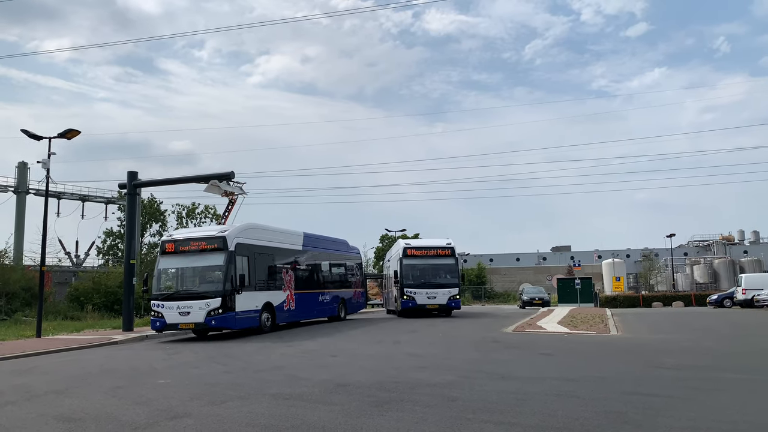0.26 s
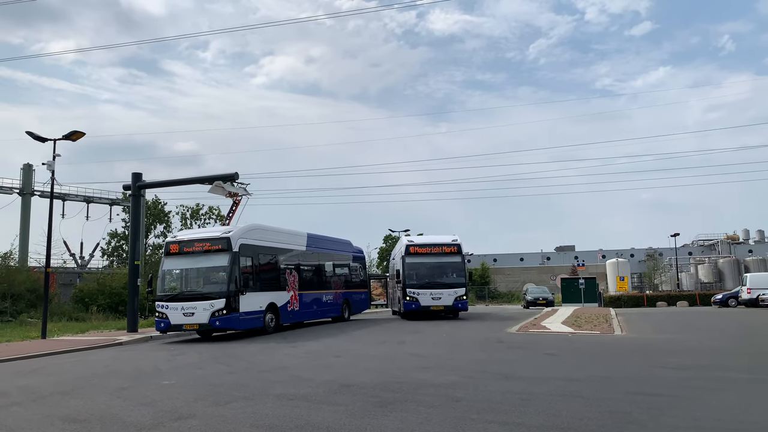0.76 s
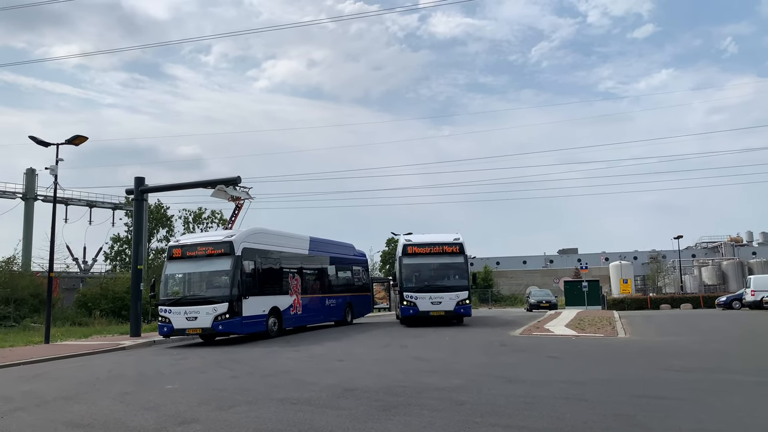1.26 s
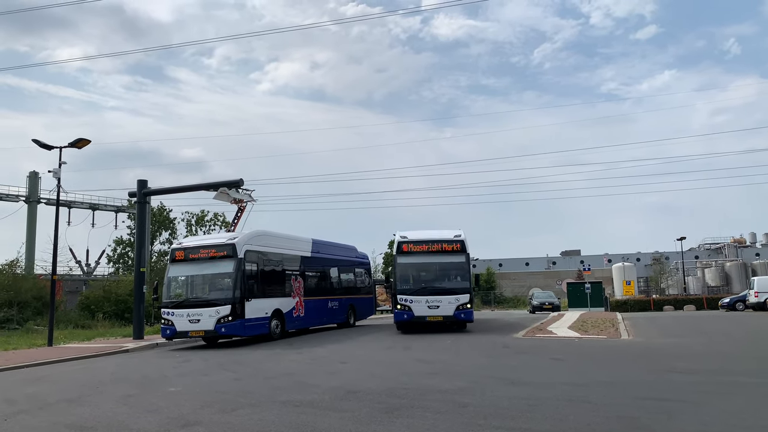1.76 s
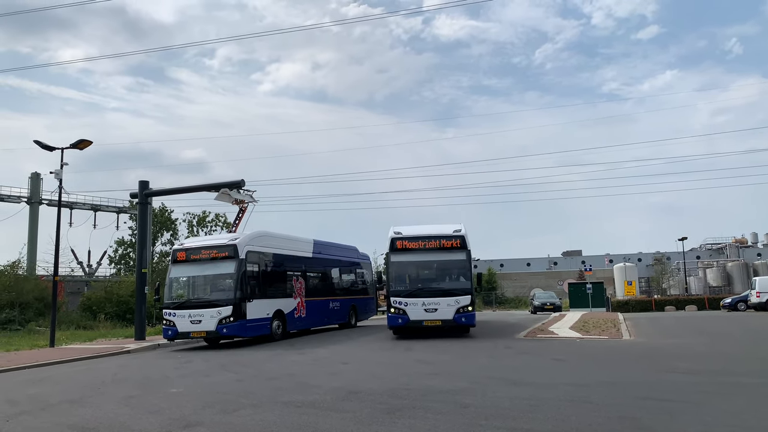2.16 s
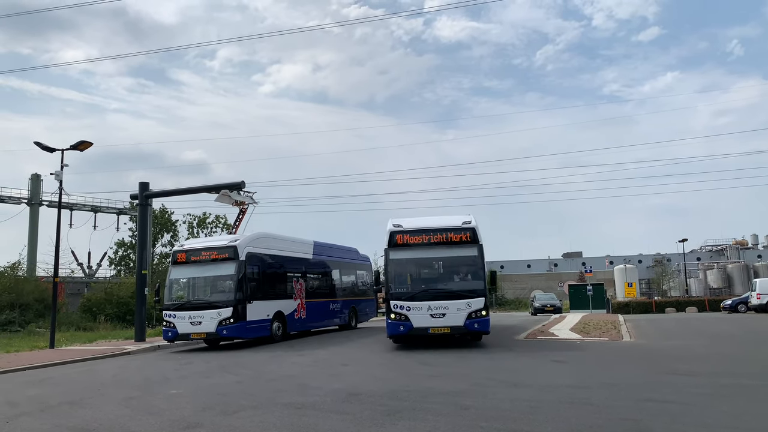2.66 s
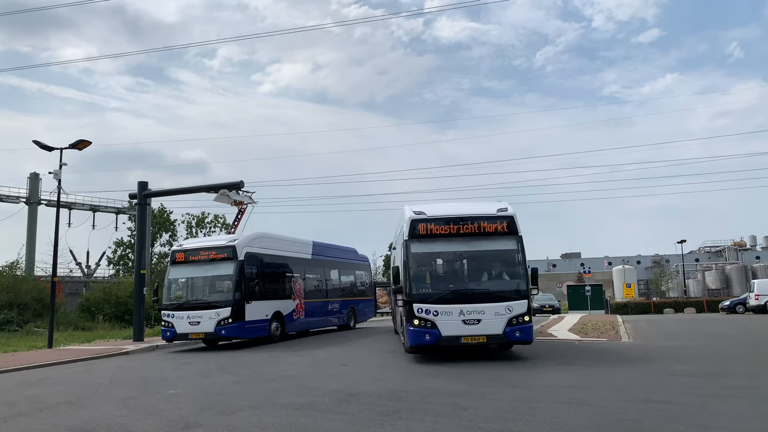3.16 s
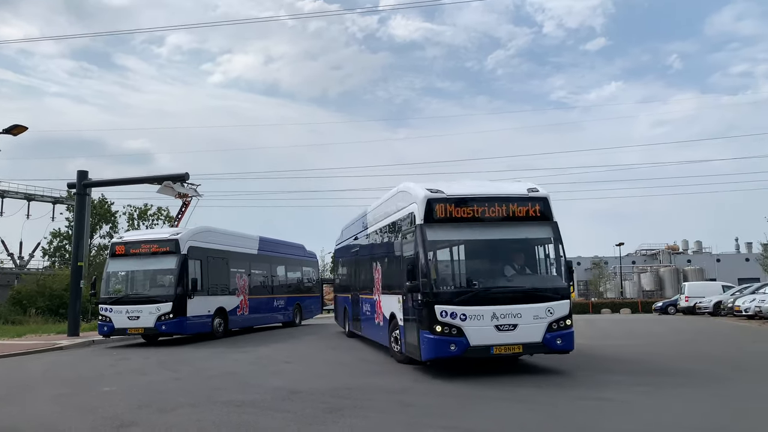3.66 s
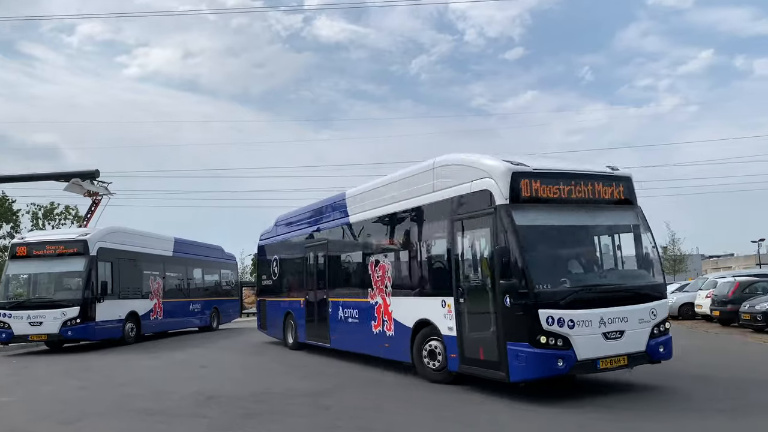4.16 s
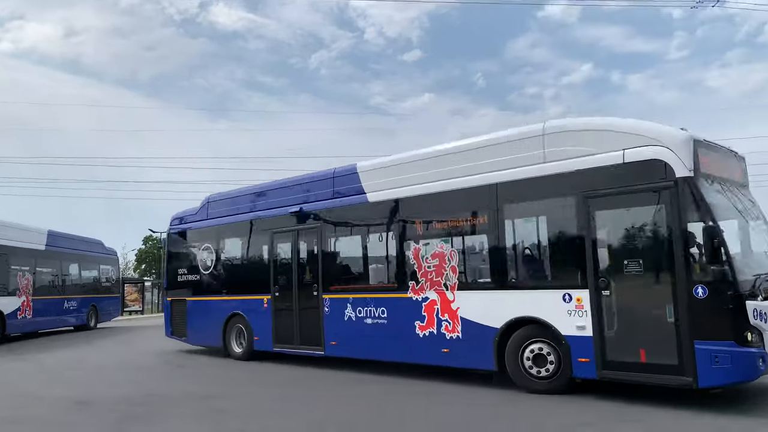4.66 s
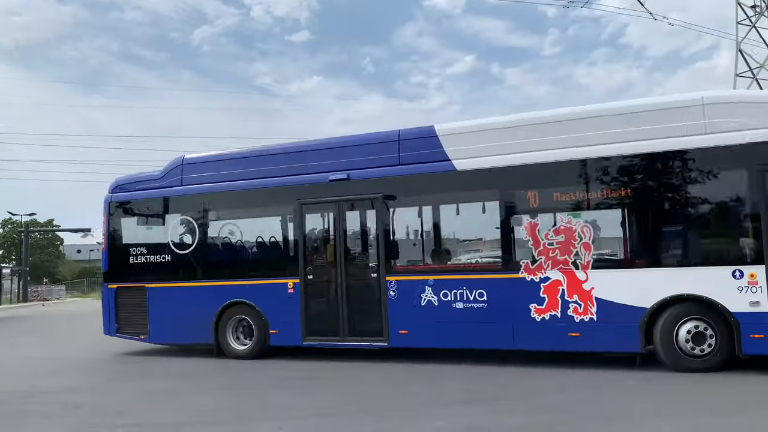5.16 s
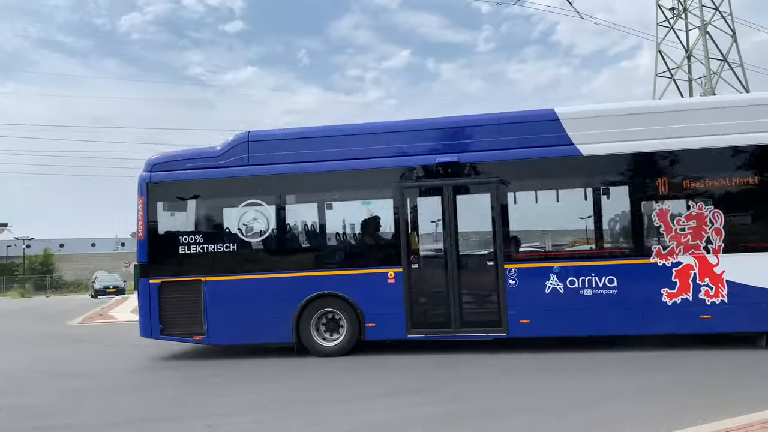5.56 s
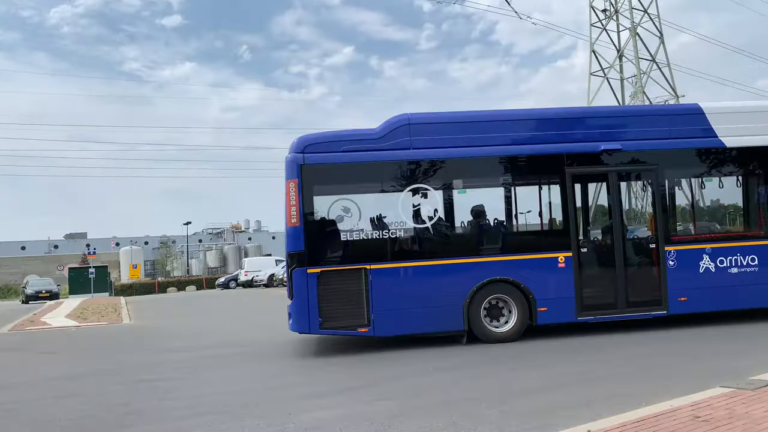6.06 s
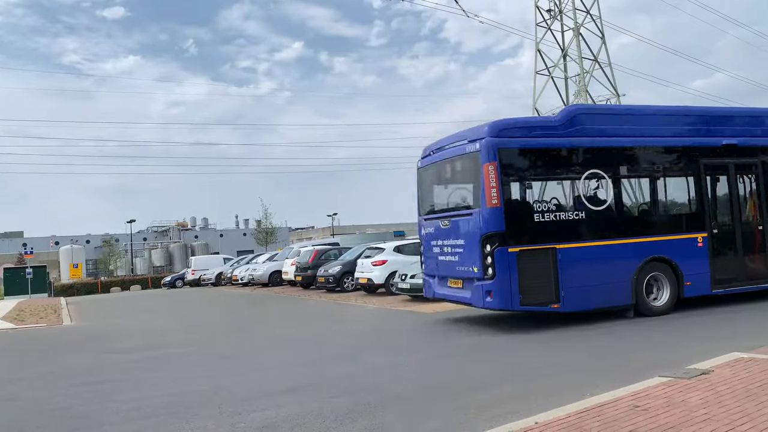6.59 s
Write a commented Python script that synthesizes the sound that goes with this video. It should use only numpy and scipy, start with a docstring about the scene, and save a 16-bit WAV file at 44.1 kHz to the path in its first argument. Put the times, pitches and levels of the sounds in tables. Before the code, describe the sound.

Outdoor yard with a soft broad wash and a faint humming parked bus. A light crackling rustle comes early, then low wind gusts thump and pop on the microphone. An electric bus approaches with a thin, very high whine; its tyres swell into a close roar with gritty hiss. The whine stops, and rear vents hiss with a hollow upward sweep and small ticks as it draws away.

```python
"""Electric bus passing in a windy yard

An electric bus pulls out past a parked one in an open yard and sweeps close by the listener.
Wind buffets the microphone as low shaped noise; axles roll as roar, hiss and grit; an inverter whines near
7.8 kHz as a tone with sidebands; rear grilles and wheel arch hiss through a ground echo that slides upward
as the bus draws away. Small ticks, an early rustle, a humming parked bus and a far tone lie under it."""
import sys
import numpy as np
from scipy import signal
from scipy.fft import rfft, irfft, next_fast_len
from scipy.io import wavfile
from scipy.ndimage import map_coordinates

SR = 44100
rng = np.random.default_rng(int(sys.argv[2]) if len(sys.argv) > 2 else 0)


def volts_from_decibels(level):
    """Turn decibel levels (scalar or array-like) into linear amplitude factors."""
    exponent = np.asarray(level, float) / 20
    return 10 ** exponent


def output_pcm(signal):
    """Save a mono or channel-first signal as 16-bit PCM at the path in sys.argv[1].

    Samples are clipped to [-1, 1] before scaling.
    """
    pcm = np.clip(np.atleast_2d(signal).T, -1, 1) * 32767
    wavfile.write(sys.argv[1], SR, np.round(pcm).astype(np.int16))


N = 301203

# All noise spectra list pitch_hz, density_db (per Hz); they give shape only, the level being set apart.
# Broad wash of the yard and parked bus; faint high hiss: pitch_hz, density_db
YARD_SPECTRUM = [(18, -35), (30, 6), (131, -6), (233, -4.5), (295, -1.5), (526, -11.5), (1160, -16),
                 (1500, -26.5), (3980, -28), (8080, -48), (9000, -44), (10000, -60.5), (11700, -68),
                 (16000, -82)]
HISS_SPECTRUM = [(4500, -2), (7000, -20), (9000, -25), (12000, -6), (16000, -29)]
# Likeness of left and right, which divides the wash into mid and side: pitch_hz, likeness (no unit)
LIKENESS = [(60, 0.75), (180, 0.98), (550, 0.92), (1650, 0.48), (4970, -0.047), (15000, 0.29)]
# Resonances of the parked bus: pitch_hz, level_db, t60_s
PARKED_HUM = [(131.2, -54.5, 0.21), (183.8, -51.5, 0.16), (291.7, -48.5, 0.22), (341, -54.5, 0.74)]
# Far tone: time_s, pitch_hz, level_db
FAR_TONE = [(0.0, 1752, -63), (6.83, 1706, -50)]
# Wind strength, as rumble: time_s, level_db
GUSTS = [(0.0, -43), (.86, -44.5), (.99, -38), (1.43, -40.5), (1.54, -22.5), (1.69, -34), (1.8, -29.5),
         (2.2, -22.5), (2.41, -39.5), (2.45, -23), (2.85, -29), (3.3, -32), (3.4, -27.5), (3.52, -31.5),
         (3.75, -24.5), (4.08, -38.5), (4.2, -29), (4.3, -34.5), (4.72, -26), (4.79, -30.5), (5.17, -36.5),
         (5.48, -30), (5.9, -36.5), (6.83, -36.5)]
# Wind rumble, flutter and the higher bursts of flutter: pitch_hz, density_db
RUMBLE_SPECTRUM = [(12, -24), (20, -5), (52, 2.5), (135, -5)]
FLUTTER_SPECTRUM = [(130, -1.5), (200, -2.5), (300, -12), (420, -19)]
BURST_SPECTRUM = [(300, 0.5), (450, -4), (650, -15)]
# Buffets, when the flutter flares: centre_s, level_db, length_s
BUFFETS = [(1.6, -35, 0.018), (1.77, -27.5, 0.016), (1.98, -36, 0.17), (2.19, -29, 0.079),
           (2.33, -34.5, 0.05), (2.66, -31, 0.073), (2.76, -35.5, 0.025), (2.86, -31.5, 0.072),
           (2.97, -33, 0.048), (3.07, -36.5, 0.13), (3.59, -33.5, 0.058), (3.75, -36, 0.08),
           (3.95, -32, 0.035), (4.5, -33.5, 0.086), (4.67, -29.5, 0.035), (5.44, -38, 0.037)]
# Sharp wind pops, topping 0.9 cycle after start: start_s, peak_db, pitch_hz
POPS = [(1.492, -21.5, 194), (1.565, -24, 237), (1.605, -18.5, 202), (1.745, -34, 197), (2.145, -17, 328),
        (2.176, -16.5, 343), (2.224, -28, 275), (2.2656, -17, 323), (3.357, -25, 195), (3.571, -11, 198),
        (3.594, -33, 234), (5.431, -16.5, 210)]
# Ticks of grit and panels, level before the mix of crack and ring: start_s, level_db, ring_hz, top_hz
TICKS = [(0.126, -48, 2670, 4000), (.295, -50, 2600, 4000), (0.3648, -41.5, 2520, 5600),
         (.553, -53, 3970, 7500), (0.591, -41.5, 2200, 4330), (0.603, -41, 3180, 4500),
         (0.686, -42, 3720, 4530), (.745, -41, 1630, 2460), (0.8, -49.5, 2900, 3500),
         (.806, -40.5, 1250, 3200), (1.476, -56, 5300, 6500), (1.486, -54, 4800, 6000),
         (1.505, -53, 5000, 6000), (2.6325, -38, 4230, 15600), (3.229, -40, 4000, 12300),
         (3.446, -45, 4830, 14200), (3.687, -34, 2830, 6040), (3.866, -39, 4170, 7760),
         (4.422, -40, 2980, 14300), (5.546, -41, 5840, 6500), (5.68, -35, 5800, 9000),
         (5.814, -36, 5550, 13800), (5.865, -43, 5400, 6500), (5.93, -35, 4640, 6000),
         (5.956, -33, 4870, 7000), (6.01, -40, 4830, 6000), (6.07, -43, 4760, 6000),
         (6.089, -44, 4800, 6500), (6.125, -38, 5840, 7000), (6.187, -40, 4900, 6000),
         (6.25, -35.5, 5200, 6500), (6.32, -43, 5250, 6200), (6.445, -37, 5600, 7000)]
# Bands cancelled or raised near the ground: pitch_hz, width_hz, level_db
GROUND_BANDS = [(486, 282, -9), (907, 62, -2), (1523, 28, -12.5), (2200, 310, -4), (2600, 280, 2.5),
                (3190, 520, -5.5), (4170, 190, 0.5), (4510, 220, -5), (5000, 2600, -2)]
# Rolling bus: time_s, roar_db, grit_db
ROLL = [(0, -58.5, -82), (1.3, -56, -88), (2.2, -54, -75.5), (2.5, -51, -66.5), (3.2, -50, -59),
        (3.45, -45.5, -58), (3.6, -42.5, -56.5), (3.9, -38, -54.5), (4.7, -37, -53.5), (5.3, -35.5, -53.5),
        (6, -34.5, -48), (6.4, -37.5, -52.5), (6.83, -39.5, -46)]
# Tyre roar of the front, then the rear axle: pitch_hz, density_db
ROAR_SPECTRA = [
    [(260, -27), (450, -10), (898, -9.5), (1270, -5.5), (1520, -17), (1760, -15), (3000, -24.5),
     (3900, -60), (6600, -120)],
    [(260, -47), (450, -5), (643, 4.5), (957, -7), (1320, -5.5), (1560, -10), (3000, -20.5), (3900, -52),
     (6600, -120)],
]
# Tread hiss and fine grit: pitch_hz, density_db
TREAD_SPECTRUM = [(880, 6), (1500, -5), (2590, 1), (4180, 3), (4960, 0), (5400, -19), (7020, -70),
                  (11900, -120)]
GRIT_SPECTRUM = [(5400, 7), (7000, -1), (9000, 5.5), (12000, -2), (16000, -6)]
# Direction of the axles, as lag of the right side: time_s, front_ms, rear_ms
AXLES = [(0, 0, 0), (4.3, .02, 0), (4.7, .09, -.07), (5.3, .13, -.15), (6, .25, -.22), (6.3, .15, -.05),
         (6.83, 0, -.14)]
# Swells of hiss: an early crackling rustle at 0.7 s, then passing swells of the tread:
# centre_s, level_db, length_s
HISS_SWELLS = [(.7, -59, 0.24), (2.55, -57.5, 0.15), (3.6, -47, 0.043), (3.9, -45.5, 0.18),
               (4.3, -48.5, 0.26)]
# Tyre carcass rings, level relative to the roar: pitch_hz, level_db, t60_s
CARCASS = [(653, -18, 0.073), (718, -9, 0.3), (803, -18, 0.33), (1169, -14.5, 0.092), (1250, -12, 0.088),
           (1336, -11.5, 0.087)]
# Bands in which the carcass ring flares, upper then lower: pitch_hz, width_hz
FLARE_BANDS = [(1250, 110), (743, 100)]
# Flares of each of these bands: centre_s, level_db, length_s
FLARES = [
    [(3.8, -47, 0.088), (4.05, -43, .05), (4.18, -40, .04), (4.45, -48, .08), (4.78, -48, .06)],
    [(4.03, -49, .04), (4.2, -46, 0.062), (4.4, -46, .04), (4.64, -36, 0.096), (4.98, -53, 0.034)],
]
# Inverter, shifted up as the bus nears and down as it passes: time_s, pitch_hz
WHINE_PITCH = [(0, 7812), (1, 7845), (2, 7868), (3.3, 7872), (3.9, 7845), (4.4, 7810), (5, 7725),
               (5.8, 7650)]
# Whine level course, cut off before its peak is reached: peak_s, level_db, rise_db_per_s, fall_db_per_s
WHINE_LEVEL = (6.5, -56.5, 4.5, 4)
# Lines about the whine: offset_hz, level_db
SIDEBANDS = [(-200, -13), (-97, -8), (0, 0), (100, -9), (196, -7)]
# Swells of the whine: start_s, end_s, gain_db
SURGES = [(.25, .5, 3.5), (1.9, 2.36, 4), (2.55, 2.98, 7), (4.55, 5.05, 3.5)]
# Faint upper pair of lines: offset_hz from the whine; then its swells: centre_s, level_db, length_s
UPPER_OFFSETS = [690, 787]
UPPER_SWELLS = [(2.15, -78, .28), (2.8, -82, .25)]
# Fan breath: peak_s, level_db, rise_db_per_s, fall_db_per_s
FAN_LEVEL = (6, -36.5, 5.5, 5.5)
# Fan hum lines, pitch at peak: pitch_hz, glide_hz_per_s, peak_s, level_db, rise_db_per_s, fall_db_per_s
FAN_HUM = [(262.3, -1.5, 6.25, -38, 7, 3), (235.6, 18, 6.4, -36, 17, 6)]
# Grilles on flank and tail, then rear wheel arch; a negative fall goes on rising:
# in_view_s, turn_s, level_db, rise_db_per_s, fall_db_per_s
GRILLES = [(5.46, 5.854, -49, 5, 4), (5.746, 6.72, -49, 21, 28), (5.998, 6.402, -57.5, 22, -13)]
# Hiss of each of the three: pitch_hz, density_db
GRILLE_SPECTRA = [
    [(1800, -22), (3300, -50), (4300, -1), (4800, 3), (5600, 4), (6300, 8), (8500, -27), (12000, 1),
     (16000, 2)],
    [(1800, 2), (2700, -2), (3300, -6), (4200, 0), (7000, 0), (12000, -32), (16000, -26)],
    [(1800, 15), (2100, 7), (2850, 7.5), (3200, -14), (4100, -18)],
]
# Ground echo of each: longest_ms, nearest_m, right_lag_ms at 6 s, lag_ms_per_s either side, bounces (count)
ECHOES = [(1.33, 5.2, -.22, .12, 2), (1.29, 6.5, -.02, -.16, 2), (1.118, 4.5, -.02, -.16, 4)]
# Comb teeth of each that stand out as gliding bands:
# tooth (number), width_hz, in_view_s, hidden_s, peak_s, level_db, rise_db_per_s, fall_db_per_s
TEETH = [
    [(6, 340, 5.75, 6.52, 5.97, -50, 8, 7), (7, 300, 5.55, 6.2, 5.85, -53.5, 8, 8)],
    [(6, 300, 6.6, 7, 6.75, -54, 12, 5)],
    [(2, 170, 6.15, 6.85, 6.38, -50.5, 10, 6)],
]


def rms_one(x):
    """Normalisation: mean power becomes 1."""
    return x / np.sqrt(np.mean(x ** 2) + 1e-20)


def in_time(rows):
    """Linear interpolation: each column is drawn out sample by sample."""
    s, *columns = np.transpose(rows)
    return [np.interp(np.arange(N) / SR, s, c) for c in columns]


def at_hz(points, hz):
    """Interpolation of a spectrum along a logarithmic frequency axis."""
    return np.interp(np.log(hz), np.log(np.array(points)[:, 0]), np.array(points)[:, 1])


def peaked(at_s, db, rise_db, fall_db):
    """Exponential growth and decay: level in dB with one slope up to at_s and another after."""
    t = np.arange(N) / SR - at_s
    return db + np.where(t < 0, rise_db * t, -fall_db * t)


def step(at_s, width_s):
    """Sigmoid transition: a smooth change from 0 to 1."""
    return .5 + .5 * np.tanh((np.arange(N) / SR - at_s) / width_s)


def bumps(rows):
    """Addition of powers: the summed power of bell-shaped swells."""
    t = np.arange(N) / SR
    return sum(volts_from_decibels(2 * db) * np.exp(-((t - s) / length) ** 2) for s, db, length in rows)


def drift(rate_hz):
    """Low-passed chance: noise below about rate_hz, spread 1, computed at every 40th sample."""
    r = np.exp(-80 * np.pi * rate_hz / SR)
    slow = signal.lfilter([1], [1, -2 * r, r * r], rng.standard_normal(N // 40 + 2002))[2000:]
    return np.interp(np.arange(N) / 40, np.arange(len(slow)), rms_one(slow))


def coloured(spectrum, channels=1):
    """Spectral shaping: noise of the given spectrum, falling steeply past both ends; rms 1."""
    size = next_fast_len(N)
    hz = np.maximum(np.arange(size // 2 + 1) * SR / size, 1)
    edge = np.minimum(hz / spectrum[0][0], 1) ** 4 * np.minimum(spectrum[-1][0] / hz, 1) ** 4
    real, imaginary = rng.standard_normal((2, channels, len(hz)))
    return rms_one(irfft((real + 1j * imaginary) * volts_from_decibels(at_hz(spectrum, hz)) * edge, size)[:, :N])


def spread(spectrum):
    """Diffuse-field coherence: mid favours the bands alike in both ears, side those unlike."""
    rows = [(hz, db, min(at_hz(LIKENESS, hz), .98)) for hz, db in spectrum]
    mid = coloured([(hz, db + 10 * np.log10(1 + alike)) for hz, db, alike in rows])[0]
    side = coloured([(hz, db + 10 * np.log10(1 - alike)) for hz, db, alike in rows])[0]
    return mid, side


def stereo(mid, side, side_db):
    """Sum and difference: the side signal enters left and right with opposite sign."""
    return mid + volts_from_decibels(side_db) * side * [[1], [-1]]


def late(x, ms):
    """Propagation delay: the signal is read a changing time earlier."""
    return map_coordinates(x, [np.arange(N) - ms * SR / 1000], order=2, mode="mirror")


def placed(x, lag_ms):
    """Interaural delay: one source reaches the right port later by lag_ms."""
    return np.array([x, late(x, lag_ms)])


def ring(x, hz, t60_s):
    """Damped resonance: a unit click sets a decaying sine of height about 1 ringing."""
    r, w = volts_from_decibels(-60 / (t60_s * SR)), 2 * np.pi * hz / SR
    return signal.lfilter([0, np.sin(w)], [1, -2 * r * np.cos(w), r * r], x + 1e-18)


def sung(hz, t60_s):
    """Noise-driven resonance: one narrow band; rms 1."""
    return rms_one(ring(rng.standard_normal(N + SR), hz, t60_s)[SR:])


def gliding(hz, width_hz):
    """Quadrature modulation: a narrow band of noise about a moving centre; rms 1."""
    low_pass = signal.butter(2, width_hz / 2, fs=SR, output="sos")
    a, b = signal.sosfilt(low_pass, rng.standard_normal((2, N)))
    phase = 2 * np.pi * np.cumsum(hz) / SR
    return rms_one(a * np.cos(phase) + b * np.sin(phase))


def yard():
    """Diffuse field and resonance: a broad wash, the parked bus humming, a gliding tone far to one side."""
    hz, db = in_time(FAR_TONE)
    tone_phase = 2 * np.pi * np.cumsum(hz + 1.9 * drift(6.0)) / SR
    tone = volts_from_decibels(db + 2.0 * drift(2.6)) * np.sin(tone_phase)
    wash = volts_from_decibels(-42.5 + 0.18 * drift(4.5)) * stereo(*spread(YARD_SPECTRUM), side_db=-11.0)
    hiss = volts_from_decibels(-82) * coloured(HISS_SPECTRUM, channels=2)
    hum = sum(volts_from_decibels(db + 2.0 * drift(2.4)) * sung(hz, t60_s) for hz, db, t60_s in PARKED_HUM)
    return wash + hiss + hum + placed(tone, 0.19)


def wind():
    """Turbulent pressure: eddies beat on the ports in lumps; flutter is lumpier and its bursts reach higher."""
    rumble_db, = in_time(GUSTS)
    # Flutter follows 0.31 of the rumble's swing about -23 dB, never under -47.5 dB
    steady_db = np.maximum(-42.5 + 0.31 * (rumble_db + 23.0), -47.5)
    flutter_db = 10 * np.log10(volts_from_decibels(2 * steady_db) + bumps(BUFFETS))
    lumps_db = 2.0 * drift(36)
    burst_db = 1.2 * (flutter_db + 32.5) - 56.5 + 8.2 * np.minimum(lumps_db, 2.0)
    rumble = volts_from_decibels(rumble_db + 1.0 * drift(7.7)) * coloured(RUMBLE_SPECTRUM, channels=2)
    flutter = volts_from_decibels(flutter_db + lumps_db) * coloured(FLUTTER_SPECTRUM, channels=2)
    burst = volts_from_decibels(burst_db) * coloured(BURST_SPECTRUM, channels=2)
    mid, side = rumble + flutter + burst
    out = stereo(mid, side, side_db=-12.5)
    for s, db, hz in POPS:   # a pop is about one strong cycle under a bell
        i = np.arange(round(s * SR) - 800, round(s * SR) + 1600)
        cycles = (i / SR - s) * hz - .9
        out[:, i] += volts_from_decibels(db) * np.exp(-cycles ** 2 / 0.18) * np.cos(2 * np.pi * cycles)
    return out


def ticks():
    """Impulsive excitation: each tick is a dying crack of noise, dulled by distance, and a short ring."""
    out, t = np.zeros((2, N)), np.arange(3000) / SR
    # 36 faint ticks at random between 0.5 and 0.85 s
    faint = [(.5 + .35 * when, -53 - 4.2 * size, 1500 + 2500 * pitch, 5000)
             for when, size, pitch in rng.random(size=(36, 3))]
    for s, db, hz, top_hz in TICKS + faint:
        i = round(s * SR)
        noise = rng.standard_normal((3, 3000)) * volts_from_decibels(-60 * t / .016)   # t60 16 ms
        # The crack reaches 1400 Hz under its ring
        band = signal.butter(2, [max(hz - 1400, 900), top_hz], "band", fs=SR, output="sos")
        crack = signal.sosfilt(np.vstack([band, band, band]), noise[0] + 0.55 * noise[1:])
        crack = signal.lfilter([1], [1, -.6], crack)   # most of the crack lies low
        crack = crack / np.abs(crack).max()
        rung = ring(crack[0], hz, t60_s=.014)
        out[:, i:i + 3000] += volts_from_decibels(db) * (1.88 * crack + volts_from_decibels(-4) * rung / np.abs(rung).max())
    return out


def near_ground(x):
    """Interference: bounces off asphalt and bodywork cancel or raise narrow bands, here fixed peaking filters."""
    for hz, width_hz, db in GROUND_BANDS:
        a, k, w = volts_from_decibels(db / 2), np.tan(np.pi * width_hz / SR), -2 * np.cos(2 * np.pi * hz / SR)
        x = signal.lfilter([1 + k * a, w, 1 - k * a], [1 + k / a, w, 1 - k / a], x)
    return x


def flares():
    """Lightly damped resonance: short swells of the carcass ringing, each band wandering in pitch."""
    out = 0
    for (hz, width_hz), rows in zip(FLARE_BANDS, FLARES):
        level = np.sqrt(bumps(rows)) * volts_from_decibels(2.4 * drift(30))
        out = out + level * gliding(hz + 44.0 * drift(3.4), width_hz)
    return out


def tyres():
    """Rolling contact: roar, hiss and fine grit from two axles, partly scattered; the hiss also carries a rustle."""
    roar_db, grit_db = in_time(ROLL)
    front_ms, rear_ms = in_time(AXLES)
    # Hiss follows 0.71 of the grit's swing about -63.5 dB; -46.5 dB is the ceiling before swells
    hiss_db = np.minimum(-55 + 0.71 * (grit_db + 63.5), -46.5)
    hiss_db = 10 * np.log10(volts_from_decibels(2 * hiss_db) + bumps(HISS_SWELLS))
    # Share of power from the rear axle: of the roar, then of the hiss
    rear_roar = np.clip(0.12 + 0.887 * step(4.6, 0.73), 0, 1)
    rear_share = np.clip(.15 + 0.5 * step(5.6, .2), 0, 1)

    grain_db = 1.54 * drift(18.0) + 1.6 * drift(88)
    roar = volts_from_decibels(roar_db + 0.28 * drift(8.9) + 0.5 * grain_db)
    hiss = volts_from_decibels(hiss_db + grain_db) * coloured(TREAD_SPECTRUM, channels=4)
    grit = volts_from_decibels(grit_db + 0.39 * grain_db + 1.0 * drift(27)) * coloured(GRIT_SPECTRUM, channels=3)
    carcass = sum(volts_from_decibels(db + 3.9 * drift(7.2)) * sung(hz, t60_s) for hz, db, t60_s in CARCASS)

    front = placed(volts_from_decibels(1.8 * drift(9.5)) * roar * (coloured(ROAR_SPECTRA[0])[0] + carcass), front_ms)
    rear = placed(volts_from_decibels(1.84 * drift(13.0)) * roar * coloured(ROAR_SPECTRA[1])[0], rear_ms)
    axle_roar = np.sqrt(1 - rear_roar) * front + np.sqrt(rear_roar) * rear
    front_hiss = np.sqrt(1 - rear_share) * placed(hiss[0], front_ms)
    rear_hiss = np.sqrt(rear_share) * placed(hiss[1], rear_ms)
    scattered = volts_from_decibels(-0.5) * hiss[2:] + volts_from_decibels(-5.5) * roar * coloured(ROAR_SPECTRA[1], channels=2)
    grit = placed(grit[0], front_ms / 8 + .022) + volts_from_decibels(-4) * grit[1:]
    return axle_roar + front_hiss + rear_hiss + scattered + grit


def whine():
    """Modulation sidebands: a switching tone with lines about 100 Hz apart, each flickering on its own."""
    whine_hz, = in_time(WHINE_PITCH)
    surge_db = sum(db * (step(on_s, 0.03) - step(off_s, 0.039)) for on_s, off_s, db in SURGES)
    main_db = peaked(*WHINE_LEVEL) + surge_db
    upper_db = 10 * np.log10(bumps(UPPER_SWELLS) + 1e-14)
    lines = [(offset_hz, main_db + db) for offset_hz, db in SIDEBANDS]
    lines += [(offset_hz, upper_db) for offset_hz in UPPER_OFFSETS]
    out = 0
    for offset_hz, db in lines:
        phase = 2 * np.pi * np.cumsum(whine_hz + offset_hz + 14.5 * drift(29.2)) / SR
        out = out + volts_from_decibels(db + 2.5 * drift(3) + 3 * drift(25)) * np.sin(phase)
    sounding = 1 - step(5.1, 0.046)   # the whine ends at 5.1 s
    return placed(out * sounding, in_time(AXLES)[0] + 0.0036)


def fan_hum():
    """Broadband and tonal fan noise: a low breath and two wavering hum lines."""
    mid, side = coloured([(150, 1.5), (250, 1.5), (380, 1.0), (480, -6.0)], channels=2)
    hum, t = 0, np.arange(N) / SR
    for hz, glide_hz, at_s, *level in FAN_HUM:
        phase = 2 * np.pi * np.cumsum(hz + glide_hz * (t - at_s) + 4 * drift(12)) / SR
        hum = hum + volts_from_decibels(peaked(at_s, *level) + 1.5 * drift(5) + 2 * drift(14)) * np.sin(phase)
    return volts_from_decibels(peaked(*FAN_LEVEL)) * stereo(mid, side, side_db=-11.0) + hum


def grilles():
    """Comb filtering: hiss plus bounces off asphalt; the gap shrinks with distance and slides the comb upward."""
    nearest_s, speed_m_s, bounced = 5.7, 5.0, .68   # bounced: share returned by the asphalt
    in_view_width_s = 0.13
    rough = signal.butter(2, 7400, fs=SR, output="sos")   # rough ground scatters the top of the echo
    out, t = 0, np.arange(N) / SR
    for grille, echo, spectrum, teeth in zip(GRILLES, ECHOES, GRILLE_SPECTRA, TEETH):
        seen_s, *level = grille
        longest_ms, near_m, lag_ms, turn_ms, bounces = echo
        echo_ms = longest_ms * near_m / np.hypot(near_m, speed_m_s * (t - nearest_s))
        flicker_db = .6 * drift(12) + 1.5 * drift(30) + 1.8 * drift(70)
        hiss = step(seen_s, in_view_width_s) * volts_from_decibels(peaked(*level) + flicker_db) * coloured(spectrum)[0]
        for _ in range(bounces):   # asphalt, then bodywork and asphalt again
            # The low-pass delays the echo about 0.03 ms, so that much is taken off here; the gap is echo_ms
            hiss = hiss + bounced * late(signal.sosfilt(rough, hiss), echo_ms - .03)
        hiss = hiss / (1 + bounced ** 2) ** (bounces / 2)
        bands = 0
        for number, width_hz, tooth_seen_s, hidden_s, *tooth_level in teeth:
            in_view = step(tooth_seen_s, in_view_width_s) - step(hidden_s, in_view_width_s)
            tooth_db = peaked(*tooth_level) + flicker_db + 1.5 * drift(20)
            bands = bands + in_view * volts_from_decibels(tooth_db) * gliding(number * 1000 / echo_ms, width_hz)
        out = out + placed(hiss + bands, lag_ms + turn_ms * abs(t - 6))
    return out


def shared_treble(x):
    """Crossover: above 7 kHz one capsule, the right, serves both sides, the left a little late."""
    size = next_fast_len(N + 512)
    hz, both = np.arange(size // 2 + 1) * SR / size, rfft(x, size)
    angle = np.pi / 4 * (1 + np.tanh((hz - 7000) / 300))   # blend over 300 Hz
    lag_ms = np.array([[.26], [0]])
    lag = np.exp(-2j * np.pi * hz * lag_ms / 1000)
    return irfft(np.cos(angle) * both + np.sin(angle) * both[1] * lag, size)[:, :N]


def scene():
    """Superposition: the pressures of all sources add."""
    low_sources = near_ground(yard() + tyres() + flares() + ticks())
    return wind() + low_sources + grilles() + fan_hum() + whine()


def top_cut(x):
    """Nothing passes above the cut-off."""
    return signal.sosfilt(signal.butter(12, 16810, fs=SR, output="sos"), x)


def record(dry):
    """Saturation and band limiting: the loudest gusts are rounded off, the treble shared, the top cut."""
    top = .3
    rounded = top * np.tanh(dry / top)
    low_pass = signal.cheby2(12, 60, 16300, fs=SR, output="sos")   # 60 dB down from 16.3 kHz
    heard = signal.sosfilt(low_pass, shared_treble(rounded))
    return top_cut(heard)


dry = scene()
out = record(dry)
output_pcm(out)
```